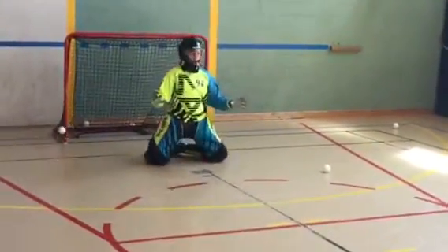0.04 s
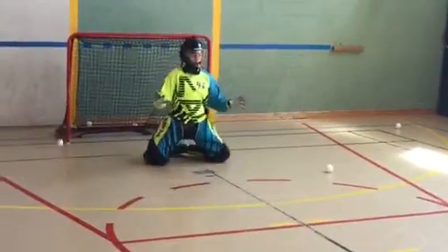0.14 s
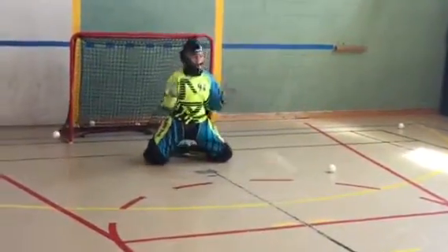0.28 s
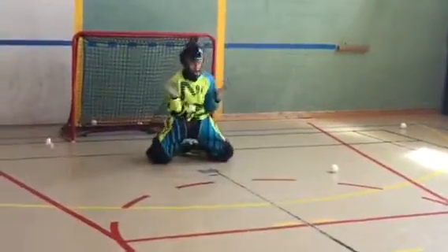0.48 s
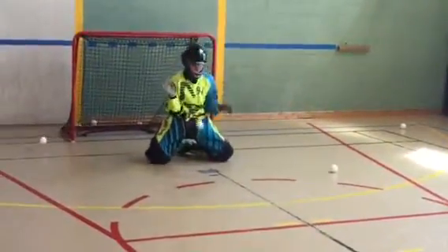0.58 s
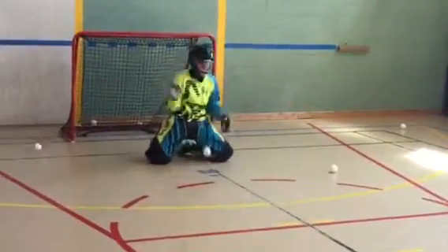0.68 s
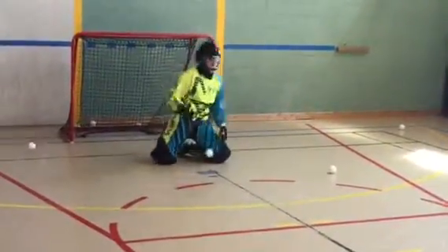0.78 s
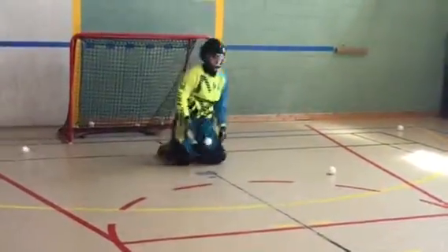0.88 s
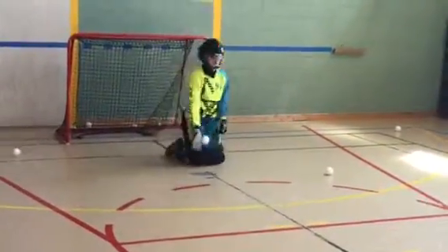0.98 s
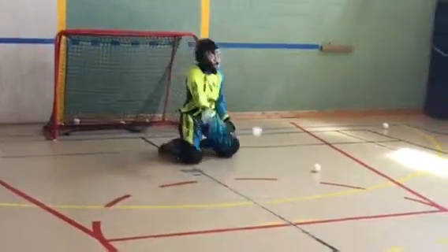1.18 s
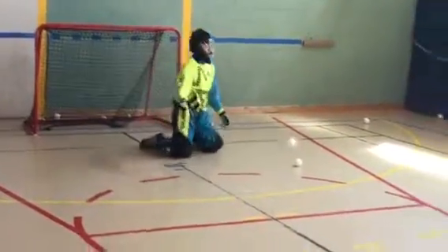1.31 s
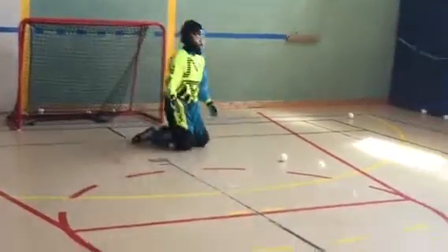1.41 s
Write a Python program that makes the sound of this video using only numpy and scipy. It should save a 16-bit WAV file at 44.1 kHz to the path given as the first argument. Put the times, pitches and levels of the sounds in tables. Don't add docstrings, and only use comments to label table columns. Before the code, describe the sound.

After a faint tick and squeak, a hollow plastic ball is struck with a loud crack, wall echoes and a long reverberant tail; soft pad thuds, floor taps and faint swishes follow, through a small, slightly saturated microphone.

```python
import sys
import numpy as np
from scipy import signal
from scipy.fft import rfft, irfft, next_fast_len
from scipy.io import wavfile
from scipy.ndimage import uniform_filter1d

SR = 44100
rng = np.random.default_rng(int(sys.argv[2]) if len(sys.argv) > 2 else 0)


def to_linear_factor(level_db):
    exponent = np.asarray(level_db, float) / 20
    return 10 ** exponent


def file_out(sig):
    cols = np.atleast_2d(sig).T
    lim = np.clip(cols, -1, 1)
    pcm = np.round(lim * 32767).astype(np.int16)
    wavfile.write(sys.argv[1], SR, pcm)


N = 63945


def along(points, hz):
    f, v = np.transpose(points)
    return np.interp(np.log(hz + 1), np.log(f + 1), v)


def unit(x):
    return x / np.sqrt(np.mean(x ** 2) + 1e-20)


def filtered(x, response):
    m = next_fast_len(len(x) + SR // 2)
    hz = np.fft.rfftfreq(m, 1 / SR)
    return irfft(rfft(x, m) * response(hz), m)[:len(x)]


def high(f, hz):
    return (1j * f / hz / (1 + 1j * f / hz)) ** 2


def low(f, hz):
    return 1 / (1 + 1j * f / hz) ** 2


def add(track, s, sound):
    part = track[round(s * SR):][:len(sound)]
    part += sound[:len(part)]


def fade(t, t60):
    return to_linear_factor(-60 * t / t60)


def patchy(spectrum, depth_db, size):
    hz, _, z = signal.stft(rng.standard_normal(N + 512), SR, nperseg=512)
    field = uniform_filter1d(rng.standard_normal(z.shape), size, 0)
    field = uniform_filter1d(field, size, 1)
    x = signal.istft(z * to_linear_factor(depth_db * unit(field)), SR, nperseg=512)[1][:N]
    return unit(filtered(x, lambda f: to_linear_factor(along(spectrum, f))))


def air():
    # frequency in Hz, level in dB per Hz.
    air_spectrum = [(30, -7.5), (170, -2), (400, -19), (620, -12.5), (900, -24.5), (2160, -26),
                    (8000, -38.5), (16000, -46)]
    return to_linear_factor(-48.5) * patchy(air_spectrum, depth_db=1.2, size=8)


def cloth():
    # middle in seconds, half length in seconds, level in dB.
    strokes = [
        (.11, 0.028, -58),
        (.655, 0.013, -44.5),
        (0.886, 0.038, -47.5),
        (1.132, 0.061, -55),
        (1.199, 0.088, -52),
    ]
    # frequency in Hz, level in dB per Hz.
    cloth_spectrum = [(600, -1), (1500, 6), (4000, -1.5), (8000, -8), (14000, -16.5), (17000, -38)]
    grain_db = 2.5
    t = np.arange(N) / SR
    stroke = sum(to_linear_factor(db) * np.exp(-((t - s) / half) ** 2) for s, half, db in strokes)
    grain = to_linear_factor(grain_db * unit(uniform_filter1d(rng.standard_normal(N), size=120)))
    return stroke * unit(grain * patchy(cloth_spectrum, depth_db=1.5, size=6))


def hall(x, tone):
    # frequency in Hz, decay time t60 in seconds.
    decay_times = [(60, 1.6), (200, 0.48), (700, 1.73), (2000, 1.346), (4000, 0.95), (8000, 0.61),
                   (14000, 0.36)]
    start_s, rise_s = .006, .01
    hz, t, z = signal.stft(rng.standard_normal(N), SR, nperseg=256)
    z = z * fade(t, along(decay_times, hz)[:, None]) * (1 - np.exp(-t / rise_s))
    tail = signal.istft(z, SR, nperseg=256)[1]
    tail = np.pad(tail, (round(start_s * SR), 0))
    tail = filtered(tail, lambda f: to_linear_factor(along(tone, f)))
    return signal.fftconvolve(x, tail / np.linalg.norm(tail))[:N]


def small_sounds_in_hall(small, rings):
    # frequency in Hz, level in dB.
    small_tone = [(60, 5), (170, 0.5), (500, -1), (1500, 0.5), (4000, 1), (16000, -1.5)]
    return to_linear_factor(-7) * hall(small + to_linear_factor(-11) * rings, small_tone)


def hollow():
    # start in seconds, level in dB, frequency in Hz, attack in seconds, t60 in seconds.
    resonances = [(.247, -8, 76, .01, .15), (.295, -14, 82, .012, .11), (.2632, -11, 5560, .0004, .024),
                  (.29, -26, 690, .01, .12), (.62, -23, 72, .02, .22), (.685, -22, 58, .02, .22),
                  (.858, -27, 150, .004, .12), (.86, -26, 72, .01, .15), (.8805, -25, 630, .003, .08),
                  (1.09, -31, 72, .015, .15), (.535, -29, 555, .008, .1), (1.3465, -38, 950, .0008, .025),
                  (.4965, -17, 1410, .0006, .016), (.085, -44, 1600, .001, .04),
                  (.086, -46, 2400, .002, .08), (.122, -48, 2400, .002, .08), (.123, -50, 3500, .002, .06),
                  (.02, -52, 2200, .005, .15), (.03, -52, 4000, .005, .1), (.05, -52, 3500, .005, .1)]
    out, t = np.zeros(N), np.arange(SR // 2) / SR
    for s, db, hz, attack, t60 in resonances:
        wander = uniform_filter1d(rng.standard_normal(len(t)), size=400).cumsum()
        drift = .25 * wander * np.sqrt(hz) / 400
        tone = np.sin(2 * np.pi * hz * t + drift)
        add(out, s, to_linear_factor(db) * fade(t, t60) * (1 - np.exp(-t / attack)) * tone)
    return out


def ticks():
    # start in seconds, level in dB.
    skips = [(.0832, -25.5), (.4985, -20), (.5185, -22.5), (.577, -26.5), (.5845, -43), (.6055, -30),
             (.6095, -40), (.8095, -31), (.8178, -42), (.8528, -22), (.8742, -24), (.9825, -39),
             (.991, -30.5), (1.013, -33)]
    out, t = np.zeros(N), np.arange(SR // 50) / SR
    for s, db in skips:
        add(out, s, to_linear_factor(db) * rng.standard_normal(len(t)) * fade(t, .004))
    return filtered(out, lambda f: high(f, 9000) * low(f, 15800))


def contact(crack_db, ring_db, low_hz, top_hz):
    # frequency in Hz, level in dB, t60 in seconds.
    shell_modes = [(655, 0.5, 0.023), (1080, -4.5, 0.012), (1517, 4.5, 0.0053), (2130, -0.5, 0.0059),
                   (3220, -5.5, 0.0064), (5754, -15, 0.013), (8400, -19.5, 0.0062), (11100, -25, 0.0033),
                   (13100, -34, 0.0047)]
    crack_t60_s, ring_rise_s, scatter_db = .0052, .00025, 2
    t = np.arange(SR // 20) / SR
    burst = rng.standard_normal(len(t)) * fade(t, crack_t60_s)
    crack = filtered(burst, lambda f: high(f, low_hz) ** 2 * low(f, top_hz))
    ring = np.zeros(len(t))
    for k, (hz, db, t60) in enumerate(shell_modes):
        level = (-1) ** k * to_linear_factor(db + scatter_db * rng.normal())
        ring += level * fade(t, t60) * np.sin(2 * np.pi * hz * t)
    return to_linear_factor(crack_db) * crack + to_linear_factor(ring_db) * ring * (1 - np.exp(-t / ring_rise_s))


def push(db, hz):
    t = np.arange(SR // 20) / SR
    swing = np.sin(2 * np.pi * hz * t) * np.exp(-1.2 * t * hz)
    return -2 * to_linear_factor(db) * swing * (1 - np.exp(-t / .0005))


def smeared(sound, smear):
    t = np.arange(SR // 50) / SR
    scatter = rng.standard_normal(len(t)) * np.exp(-t / abs(smear))
    scatter = filtered(scatter, lambda f: high(f, 304))
    return signal.fftconvolve(sound, scatter / np.linalg.norm(scatter))


def taps():
    # start in seconds, crack in dB, ring in dB, push in dB, push frequency in Hz.
    landings = [(.0832, -18.5, -40.5, -49, 283), (.4965, -10.5, -19.5, -65, 307),
                (.4982, -21.5, -36.5, -19, 286), (.4998, -34, -40.5, -13, 300),
                (.5085, -61, -18.5, -20, 348), (.5205, -52.5, -54, -16.5, 590), (.538, -50, -43, -23, 247),
                (.588, -52, -25, -30, 231), (.6095, -19.5, -48, -27, 304), (.8395, -12.5, -29.5, -37, 313),
                (.8535, -25, -24, -27, 400), (.8742, -45, -37.5, -26.5, 176), (1.138, -34, -43, -66, 300),
                (1.347, -59, -47, -64, 200), (1.428, -63, -66, -38.5, 150)]
    out = np.zeros(N)
    for s, crack_db, ring_db, push_db, push_hz in landings:
        blow = contact(crack_db, ring_db, low_hz=1000, top_hz=6000)
        add(out, s, smeared(blow, .0012))
        add(out, s, push(push_db, push_hz))
    return filtered(out, lambda f: low(f, 7000))


def shot():
    # crack in dB, low edge of the crack in Hz, ring in dB, smear in seconds.
    returns = [(-8.5, 1620, -14, 0.0014), (-16, 1300, -14, .002), (-0.5, 1800, -14, .00015),
               (-3, 3100, -16.5, 0.00156), (-10, 1800, -16.5, 0.0013), (-6, 680, -20, 0.00033),
               (-4, 900, -18, .00015), (-16, 1400, -30, 0.00054), (-18, 2100, -17, 0.0005)]
    # delay after the strike in seconds; the blade's rebound, then the walls.
    delays = [.0028, .0124, .0255, .0268, .0422, .0543, .0666, .078, .1095]
    # frequency in Hz, level in dB.
    tail_tone = [(60, -3), (200, 8.5), (650, 1), (1000, 3.5), (2000, 4), (3000, -0.5), (8000, -4),
                 (16000, -11)]
    strike_s, top_hz = .2377, 15840
    out, kick = np.zeros(N), np.zeros(N)
    strike = contact(crack_db=6, ring_db=-4, low_hz=1570, top_hz=top_hz)
    add(out, strike_s, strike + push(-18.5, 196))
    for delay, (crack_db, low_hz, ring_db, smear) in zip(delays, returns):
        echo = contact(crack_db, ring_db, low_hz, top_hz)
        add(out, strike_s + delay, smeared(echo, smear))
    kick[round(strike_s * SR)] = to_linear_factor(11.5)
    return out + hall(kick, tail_tone)


def scene():
    small, rings = taps() + ticks(), hollow()
    wet = small_sounds_in_hall(small, rings)
    return (shot() + small + rings + wet + cloth() + air())[None]


def top_cut(x):
    return signal.sosfilt(signal.butter(12, 17850, fs=SR, output="sos"), x)


def record(dry):
    ceiling, knee = .7, 5
    top_hz, edge_hz, shelf_db, slope_hz = 15700, 16800, -26, 120

    def below(f, hz):
        return (1 - np.tanh((f - hz) / slope_hz)) / 2

    x = filtered(dry[0], lambda f: high(f, 55) * high(f, 45))
    x = x / (1 + abs(x / ceiling) ** knee) ** (1 / knee)
    x = filtered(x, lambda f: below(f, top_hz) + to_linear_factor(shelf_db) * below(f, edge_hz))
    return top_cut(x[None])


dry = scene()
out = record(dry)
file_out(out)
```